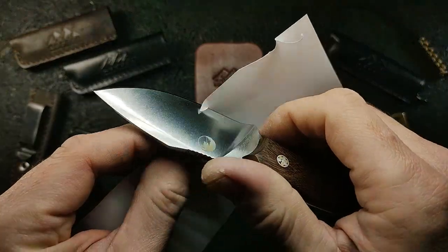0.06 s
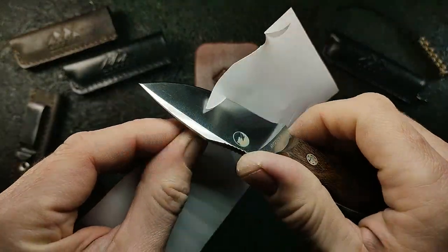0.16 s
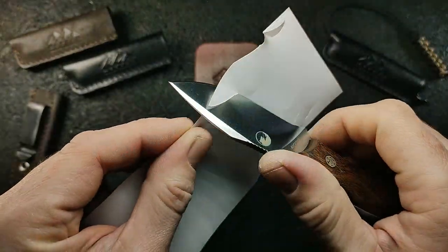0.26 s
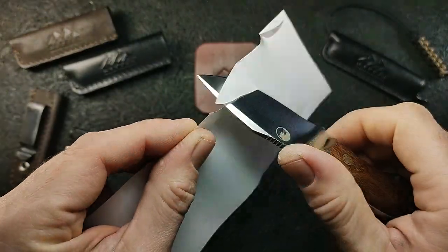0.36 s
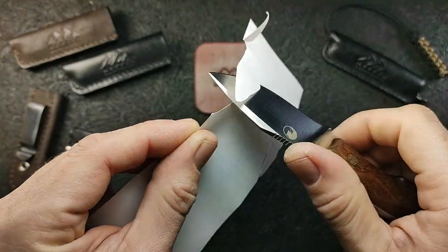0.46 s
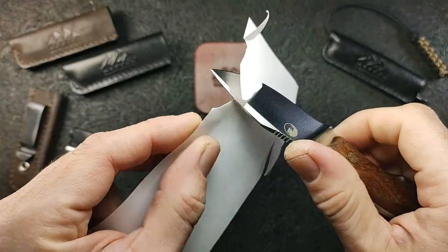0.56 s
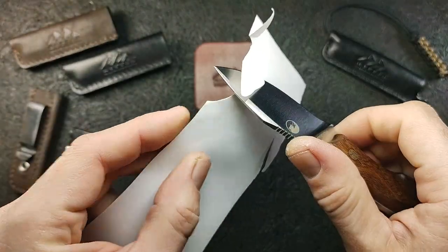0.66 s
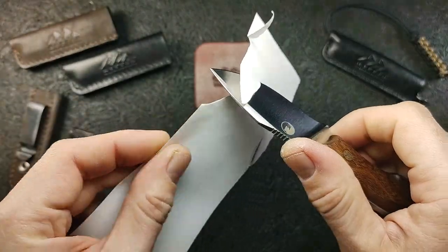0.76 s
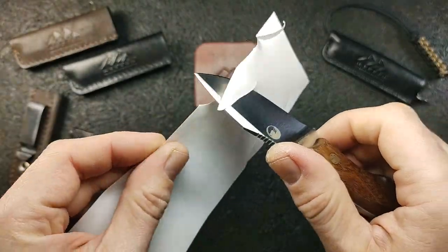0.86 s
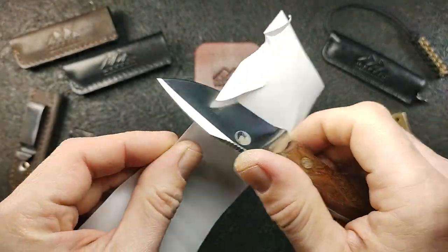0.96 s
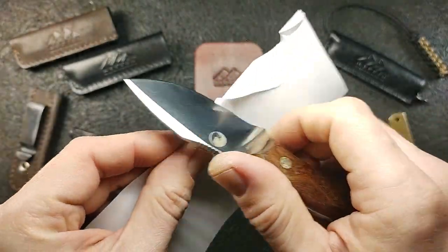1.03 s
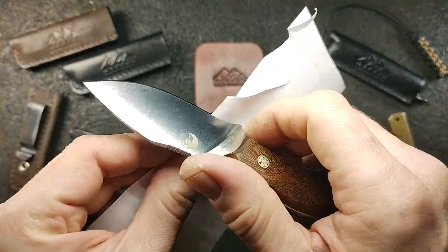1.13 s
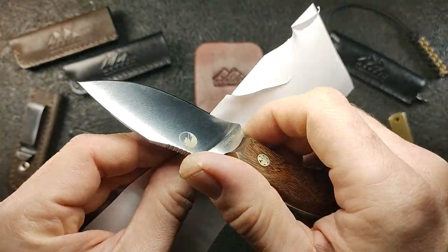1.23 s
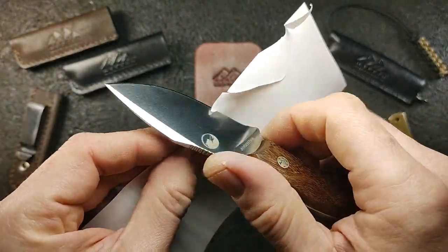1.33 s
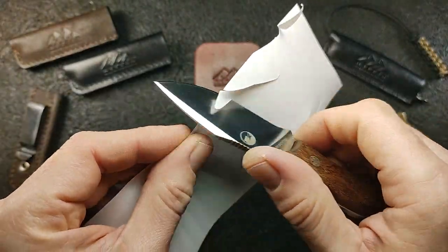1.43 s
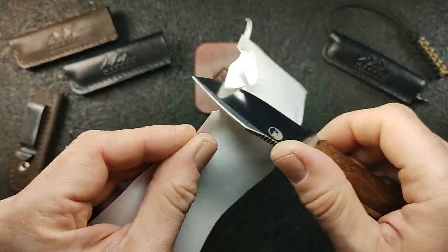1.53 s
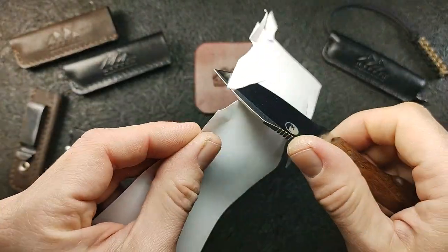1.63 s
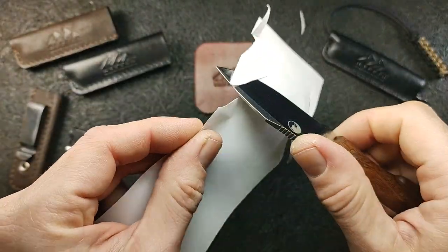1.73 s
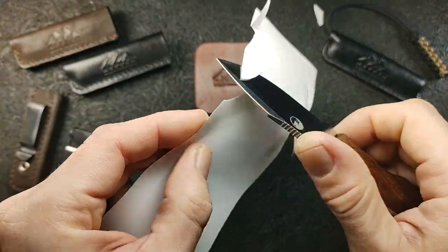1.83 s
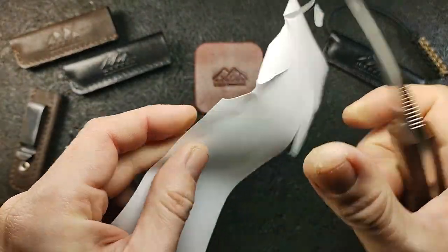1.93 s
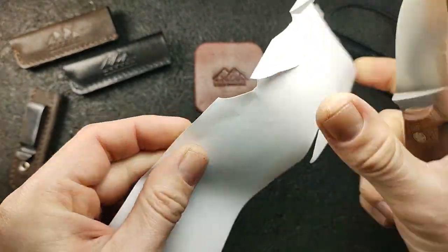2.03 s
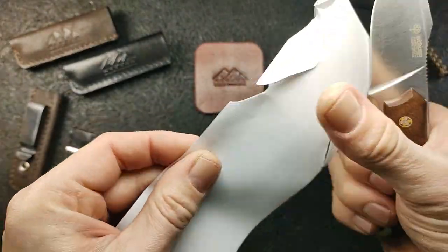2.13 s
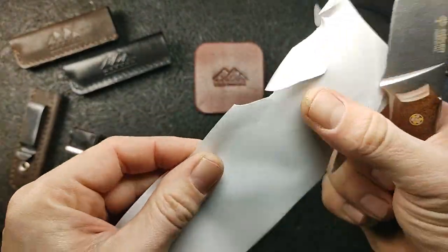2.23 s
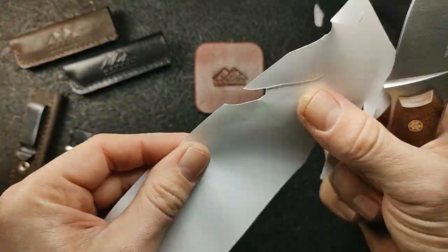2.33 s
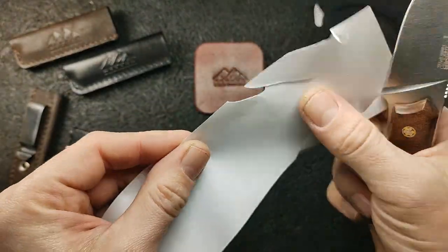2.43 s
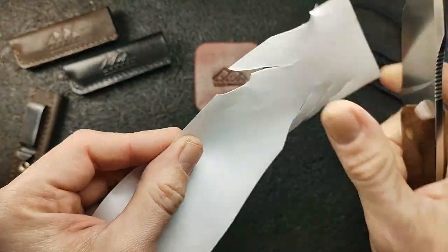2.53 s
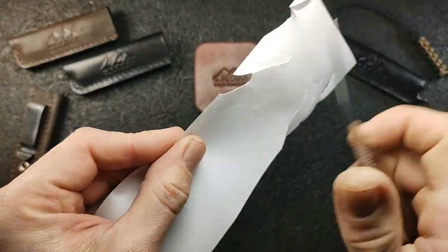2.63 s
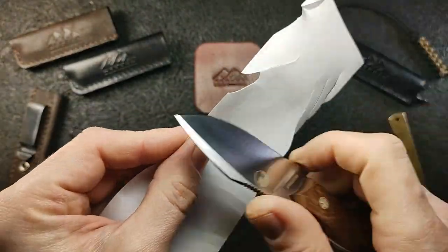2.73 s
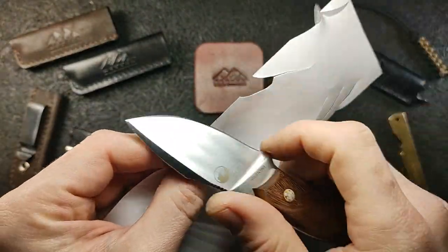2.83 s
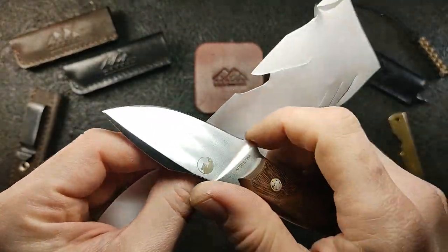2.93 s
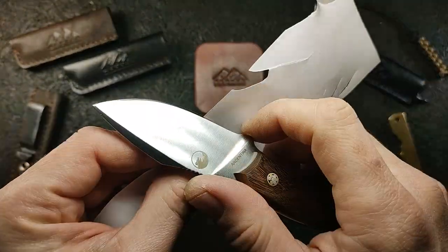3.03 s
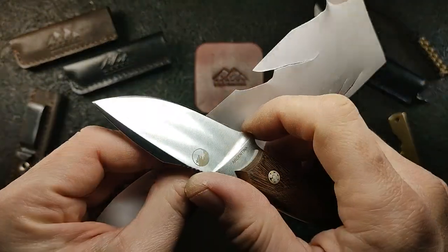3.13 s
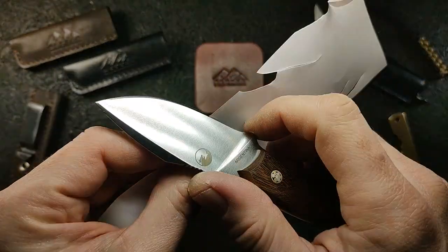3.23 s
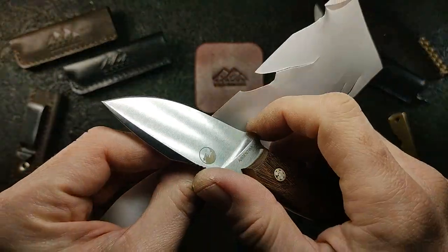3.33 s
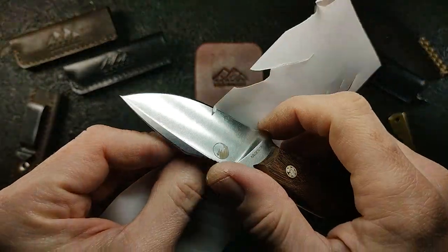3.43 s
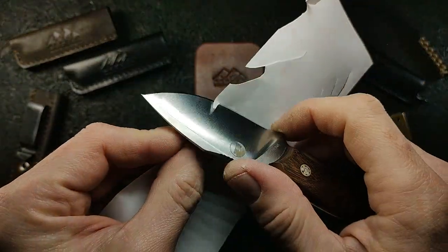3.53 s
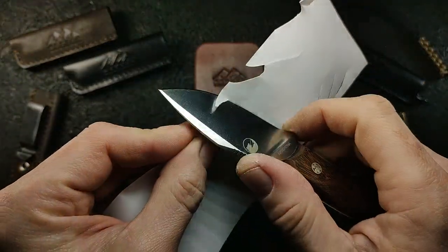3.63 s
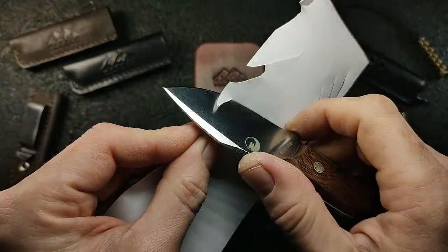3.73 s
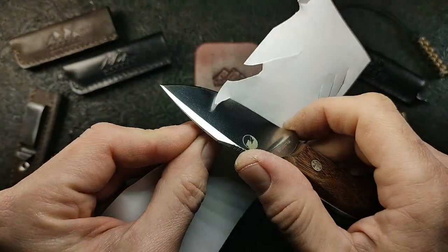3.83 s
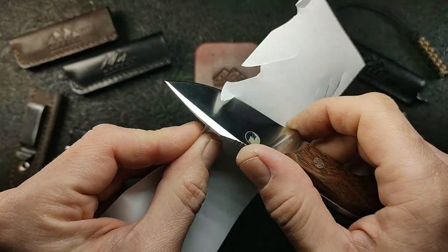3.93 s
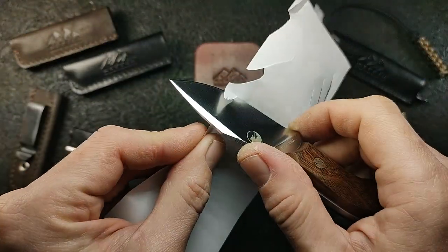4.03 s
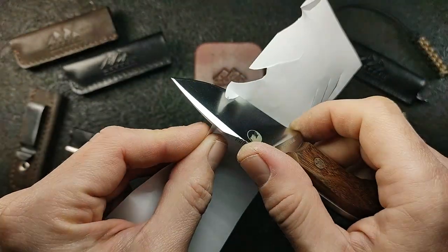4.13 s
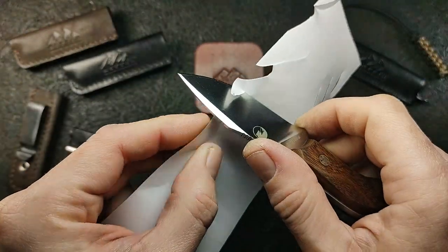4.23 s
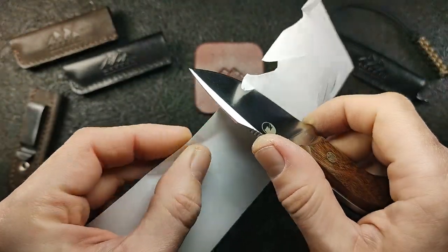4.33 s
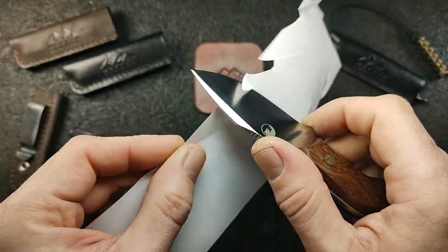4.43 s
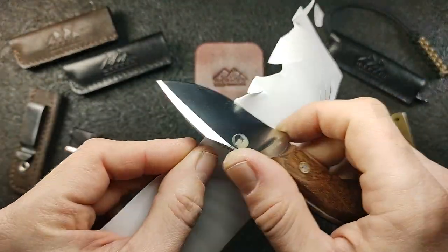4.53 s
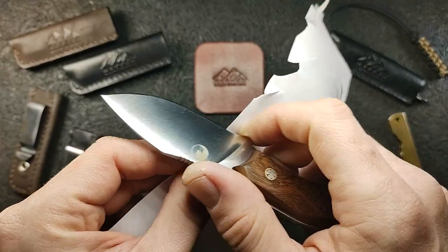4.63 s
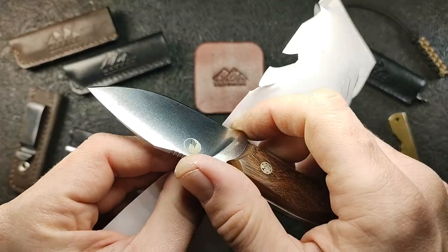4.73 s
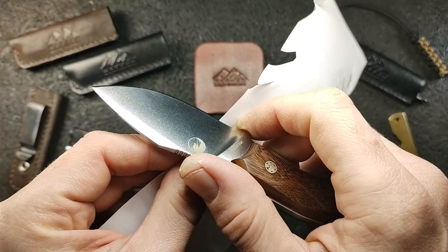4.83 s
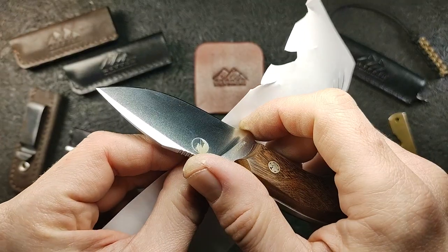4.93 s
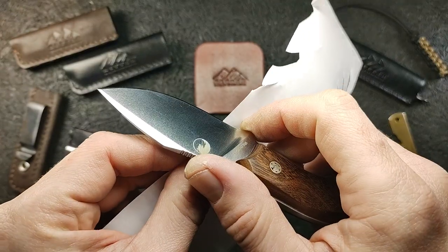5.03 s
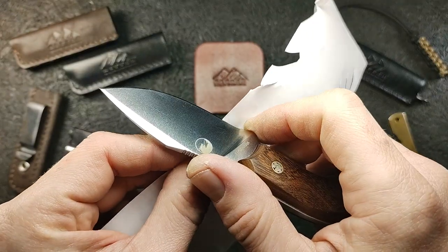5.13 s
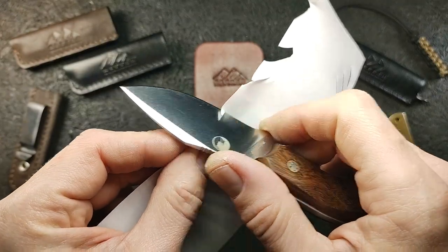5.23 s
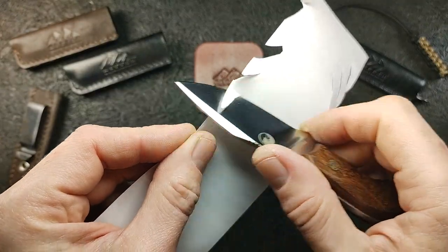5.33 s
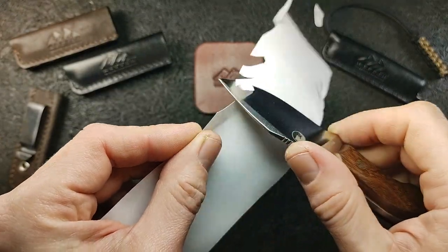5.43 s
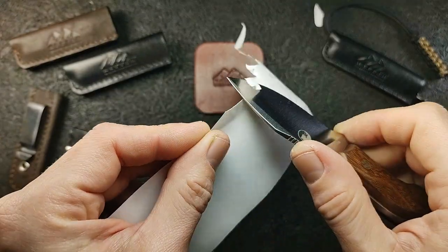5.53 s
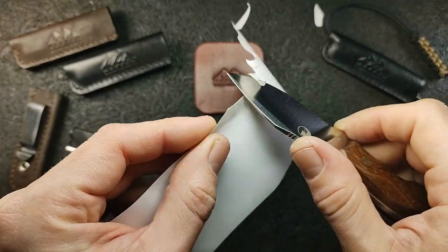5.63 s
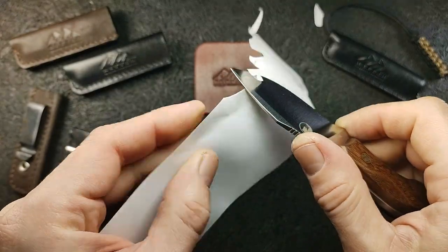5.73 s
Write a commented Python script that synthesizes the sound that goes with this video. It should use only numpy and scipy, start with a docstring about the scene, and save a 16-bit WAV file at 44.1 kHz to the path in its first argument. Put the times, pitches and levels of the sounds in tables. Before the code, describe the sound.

A sharp knife slices a hand-held sheet of paper close to the microphone, in a quiet room with a faint low hum. The first cut swells from about 0.2 seconds into a crisp, fizzing rasp, ending near 0.7 with small pops. A light scrape comes at 1.2, and a second strong slice builds from 1.4 to 1.8, finishing with a papery snap. From 2 seconds the sheet rustles softly under the fingers, then crinkles, with sharp pops near 2.5 and 2.7. After a faint scratch around 3.1, a gentler, uneven cut runs from 3.5 to 3.9, followed by a brief crackling nick at 4.1. Soft sliding hiss and little ticks continue until about 5. A last bright slice rises from 5.3 and dies away by 5.8 seconds.

```python
"""Close above a desk in a faintly humming room, a sharp knife slices strips off a hand-held sheet of paper.
Fibres fracture by the thousand at the edge; the strip's resonance glides up or down from push to push.
Between strokes, friction of fingers and blade makes the sheet hiss, buckling excites its modes
in small pops, and a new grip crumples it. Reflections off desk and hands follow the direct sound."""
import sys
import numpy as np
from scipy import signal
from scipy.fft import rfft, irfft, next_fast_len
from scipy.io import wavfile
from scipy.ndimage import map_coordinates

SR = 44100
rng = np.random.default_rng(int(sys.argv[2]) if len(sys.argv) > 2 else 0)


def materialize(psi):
    """Save the field psi as 16-bit PCM at rate SR to the path in sys.argv[1].

    A 1-D psi becomes a single channel; in a 2-D psi each row is a channel.
    """
    bounded = np.clip(np.atleast_2d(psi).T, -1, 1)
    quanta = np.round(bounded * 32767).astype(np.int16)
    wavfile.write(sys.argv[1], SR, quanta)


N = 254898

# The slow drift of the room's hum. Each row: time in seconds, level in dB.
HUM_LEVELS = [(0.0, -72), (0.26, -66.5), (0.46, -60), (1.33, -71), (2.58, -67), (2.78, -71), (3.73, -66),
              (4.1, -69.5), (5.13, -64.5), (5.57, -63), (5.78, -70)]
# Skin and the flat of the blade slide on the sheet. Each row: start, rise, hold and fall in seconds,
# hiss level in dB, murmur in dB relative to the hiss.
SLIDE_MOVES = [ (0.092, 0.021, 0.084, .03, -72, -6.5), (0.201, .008, 0.031, 0.11, -58.5, -10.5),
               (0.709, 0.081, 0.016, 0.32, -57.5, -5), (0.862, 0.069, 0.053, 0.35, -58.5, -6),
               (1.251, 0.063, 0.06, 0.064, -64, 0.5), (1.446, 0.01, .04, .04, -67, 3),
               (1.736, 0.017, 0.0057, 0.29, -64, 0.5), (1.934, 0.048, 0.031, 0.48, -56.5, -8.5),
               (2.117, 0.0053, 0.011, 0.017, -50.5, -16), (2.182, 0.074, 0.12, 0.084, -54, -14.5),
               (2.387, 0.027, 0.075, 0.25, -59, -5), (2.608, 0.009, 0.033, .03, -62, 1),
               (2.716, 0.014, 0.009, 0.18, -61, -2.5), (2.868, 0.047, 0.0075, 0.072, -54.5, -12),
               (3.387, 0.032, 0.012, 0.046, -76.5, 8.5), (3.515, 0.021, .02, 0.047, -72, 1),
               (3.912, 0.027, 0.064, 0.093, -82.5, 8.5), (4.17, 0.0092, 0.0086, 0.048, -58, -6),
               (4.243, 0.034, .014, 0.047, -57, -6), (4.35, 0.049, 0.18, 0.15, -57, -7.5),
               (4.685, 0.059, 0.079, 0.23, -59.5, -4.5), (4.943, 0.042, 0.065, 0.072, -67, -1.5),
               (5.275, 0.027, 0.046, 0.067, -71.5, -0.5)]
# The sheet buckles. Each row: start in seconds, peak level of the pop in dB, its centre in Hz,
# crackle and thump in dB relative to the pop.
BUCKLES = [ (0.092, -72.5, 2580, 14, -15), (0.117, -66.5, 2600, 10.5, -11), (0.203, -52, 1700, 3.5, -15),
           (0.215, -53.5, 1640, 5, -30), (0.48, -47.5, 2630, 9, -33), (0.601, -26, 1830, -12, -34),
           (0.677, -43, 1390, -10, -21), (0.733, -39.5, 450, -20, -5), (0.771, -36.5, 450, -15, -11),
           (1.066, -52.5, 452, 3, 1), (1.7, -29.5, 994, -12, -9.5), (1.723, -30.5, 598, 4, -7.5),
           (1.748, -41, 705, -10, -12), (2.021, -42.5, 776, -18, -12), (2.319, -44.5, 1700, 2, -22),
           (2.336, -37, 1330, -19, -27), (2.363, -43.5, 2440, 4, -28), (2.411, -44, 1730, 1, -18),
           (2.448, -39, 425, -4, -25), (2.455, -30, 1410, -13, -9), (2.484, -20.5, 1680, -7, -6),
           (2.677, -27, 1690, 6, -19), (2.7, -41.5, 705, 8.5, -8), (2.767, -54, 425, 12, -17),
           (3.258, -54, 2480, 9.5, -22), (4.089, -55, 480, 11, -30), (4.11, -37, 1730, -10, -40),
           (4.139, -38, 2570, -0.5, -11), (4.16, -31.5, 1300, -20, -33), (4.182, -57.5, 1710, 10.5, -19),
           (4.283, -44.5, 2530, 11.5, -31), (4.625, -54.5, 372, -15, -6), (4.685, -43.5, 2100, -3, -12),
           (4.697, -45, 478, 3, -13), (4.767, -49, 2470, 5.5, -25)]
# Bending modes of the sheet. Each row: frequency in Hz, bandwidth in Hz, gain in dB.
SHEET_MODES = [(423, 300, 5.5), (512, 266, 6.5), (833, 140, -0.5), (1274, 89, 0.5), (1712, 77, 3.5),
               (2416, 183, -4), (3260, 430, -6.5)]
# Pushes of the edge, one to five to a stroke. Each row: start, rise, hold and fall in seconds, rasp level
# in dB, fizz and flutter in dB relative to the rasp, strip resonance in Hz, its height in dB.
KNIFE_PUSHES = [ (0.145, 0.21, .085, 0.065, -42, 0, -17.5, 4400, 7),
                (0.44, 0.1, 0.033, .04, -31, -12, -27.5, 6190, 10.5),
                (0.468, 0.013, 0.027, 0.096, -40, 1, -24, 5370, 10),
                (0.548, .035, 0.033, 0.06, -30, -10.5, -27, 4660, 14.5),
                (0.6, 0.026, 0.03, 0.054, -40, -9.5, -5.5, 3720, -3),
                (1.13, 0.047, 0.022, 0.097, -50.5, -11.5, -14.5, 3650, 9.5),
                (1.18, 0.061, 0.029, 0.1, -49, 1, -17.5, 5730, 7.5),
                (1.425, 0.23, .018, 0.039, -32, -0.5, -17, 4900, 6),
                (1.686, 0.017, 0.05, .026, -39.5, 0, -8, 5600, 7.5),
                (3.033, 0.019, 0.025, 0.046, -51, -7, -22, 2620, 10.5),
                (3.06, 0.062, 0.095, 0.055, -60, -13, -17.5, 2520, 10.5),
                (3.245, 0.012, 0.013, 0.24, -62, -15, -17, 2740, 11),
                (3.545, 0.083, 0.089, 0.037, -42.5, -11.5, -22, 4800, 7),
                (3.665, 0.039, 0.022, 0.18, -40, -11.5, -17.5, 3300, 2),
                (3.775, 0.038, 0.028, 0.061, -42, -10, -12, 3060, 7),
                (3.83, 0.027, 0.046, 0.022, -41.5, -5, -11, 3100, 2.5),
                (4.088, 0.024, .03, 0.036, -43, -6, -15.5, 3130, 1.5),
                (5.305, 0.2, 0.038, .05, -35, -4, -20, 4460, 9.5),
                (5.535, 0.014, 0.029, 0.11, -30.5, -4.5, -30, 4460, 26.5),
                (5.555, 0.043, 0.034, 0.069, -34, -12, -14.5, 4830, 2.5)]
# The fingers take a new grip. Each row: the same quantities as for a push of the edge.
GRIP_MOVES = [ (2.44, .017, 0.0074, 0.072, -46, -5.5, -5.5, 3470, 4.5),
              (2.47, 0.018, .008, 0.066, -45, -7, -9, 3630, 12),
              (2.647, .012, 0.026, 0.065, -43, -4, -11.5, 4530, 17)]

# Spectra of the noises. Each row: frequency in Hz, relative spectral density in dB.
HUM_SPECTRUM = [(20, -52.5), (33, -28), (45, -6.5), (58, -12), (86, 0), (115, -15.5), (155, -13.5),
                (200, -28.5), (400, -52.5)]
AIR_SPECTRUM = [(30, -28.5), (150, -2), (300, -8.5), (800, -12.5), (2000, -17), (2450, -15), (3300, -21.5),
                (4200, -19.5), (7000, -25), (11000, -28), (15800, -26.5)]
HISS_SPECTRUM = [(1500, -18.5), (3200, 4.5), (4200, 1), (7000, 3.5), (10000, -0.5), (15800, -3.5)]
MURMUR_SPECTRUM = [(100, -29.5), (450, -1.5), (950, -5.5), (1350, -1), (1950, -5.5), (2450, 0), (3100, -15),
                   (4200, -2), (8000, -58.5)]
CREASE_SPECTRUM = [(300, -10.5), (1200, -16.5), (2700, 2.5), (5000, 2.5), (8000, -9), (11000, -12.5),
                   (15800, -12)]
RASP_SPECTRUM = [(600, -56), (1050, -3), (1320, 8.5), (1550, 2), (1800, 9), (2080, 0), (2650, 7),
                 (3200, -4), (3950, 2), (4500, -3), (5300, 0), (7200, 0), (8800, -8.5), (11000, -35)]  # peaks at the sheet's own resonances
FIZZ_SPECTRUM = [(6000, -33), (8500, -0.5), (9800, -2), (11200, -0.5), (12600, 0), (14700, -1),
                 (15800, -6.5)]
FLUTTER_SPECTRUM = [(60, -36.5), (150, -3), (280, -9.5), (450, 1.5), (620, -3), (800, 5), (1000, -6.5),
                    (1500, -9), (3000, -78.5)]

# Likeness of left and right. Each row: frequency in Hz, correlation from 0 to 1.
STEREO_CORRELATION = [(60, 1), (600, 0.61), (1300, 0.25), (2500, 0.74), (15000, 0.11)]
# Colour of the reflections off desk, hands and room. Each row: frequency in Hz, gain in dB.
REFLECTION_GAINS = [(100, -44.5), (500, -18), (1200, -7), (2200, 2), (5000, 3), (15000, -1)]

# Amplitude is a power of hand speed: the fizz needs a fast edge, the sheet flutters at any speed.
RASP_POWER, FIZZ_POWER, FLUTTER_POWER, SLIDE_POWER = 2.42, 2.7, 1.62, 2.27


def amp(db):
    """Amplitude grows tenfold for every 20 dB."""
    return 10 ** (np.asarray(db) / 20)


def unit(x):
    """Normalisation to an rms of 1."""
    return x / np.sqrt(np.mean(x ** 2) + 1e-20)


def along(points, hz):
    """Interpolation of (Hz, value) points on a logarithmic frequency axis."""
    knots_hz, values = np.transpose(points)
    return np.interp(np.log(hz + 1), np.log(knots_hz + 1), values)


def per_sample(control):
    """Linear interpolation of a slow control to one value per sample."""
    return np.interp(np.arange(N), np.linspace(0, N, len(control)), control)


def wobble(rate):
    """Smooth random modulation: a spline through rate Gaussian knots a second."""
    return map_coordinates(rng.standard_normal(int(N * rate / SR) + 4), [np.arange(N) * rate / SR])


def filtered(x, response):
    """Linear filtering multiplies the spectrum by a complex frequency response."""
    n = x.shape[-1]
    size = next_fast_len(n + SR // 8, real=True)
    return irfft(rfft(x, size) * response(np.fft.rfftfreq(size, 1 / SR)), size)[..., :n]


def coloured(x, spectrum):
    """Spectral shaping, normalised to an rms of 1."""
    return unit(filtered(x, lambda hz: amp(along(spectrum, hz))))


def stereo(pair):
    """Partial coherence: independent mid and side signals give channels most alike in the bass."""
    def weights(hz):
        angle = np.arccos(np.clip(along(STEREO_CORRELATION, hz), -1, 1)) / 2
        return np.array([np.cos(angle), np.sin(angle)])
    mid, side = filtered(pair, weights)
    return np.array([mid + side, mid - side])


def speeds(moves):
    """Uniform acceleration: in each move the hand's speed rises from 0 to 1, holds and falls to 0."""
    t = np.arange(0, N, 32) / SR
    return np.array([np.interp(t, np.cumsum(np.abs(move[:4])), [0, 1, 1, 0]) for move in moves])


def envelope(speed, db, power):
    """Incoherent sources add in power; each move reaches its level at full speed."""
    return per_sample(np.sqrt(amp(db) ** 2 @ speed ** (2 * power)))


def room_hum():
    """Background noise: a low hum that drifts in level, under faint steady air."""
    times, levels_db = np.transpose(HUM_LEVELS)
    hum_db = np.interp(np.arange(N) / SR, times, levels_db)
    hum = amp(hum_db) * coloured(rng.standard_normal((2, N)), HUM_SPECTRUM)
    air = amp(-71.0) * coloured(rng.standard_normal((2, N)), AIR_SPECTRUM)
    return stereo(hum + air)


def fibre_snaps(per_second, scatter_db, friction, delay_s=.002):
    """Shot noise: fibres let go at random over smooth friction, radiating unevenly in two directions."""
    hits = rng.random(N) < per_second / SR
    sizes = amp(scatter_db * np.clip(rng.standard_normal(N), -2, 2))
    signs = rng.choice([-1, 1], (2, N))
    # Dispersion: high bending waves travel faster, so a snap is a falling chirp; delay_s holds at 1 kHz.
    chirps = filtered(hits * sizes * signs, lambda hz: np.exp(-4j * np.pi * delay_s * np.sqrt(hz * 1000)))
    return unit(unit(chirps) + friction * rng.standard_normal((2, N)))


def sliding():
    """Sliding friction on the paper's grain radiates a fine hiss over the murmur of the sheet."""
    speed = speeds(SLIDE_MOVES)
    hiss_db, murmur_db = np.transpose(SLIDE_MOVES)[4:]
    grain = fibre_snaps(per_second=3200, scatter_db=-1.0, friction=1.0) * amp(0.68 * wobble(90))
    hiss = envelope(speed, hiss_db, SLIDE_POWER) * coloured(grain, HISS_SPECTRUM)
    murmur = envelope(speed, hiss_db + murmur_db, SLIDE_POWER) * coloured(grain, MURMUR_SPECTRUM)
    return hiss + murmur


def resonance(hz, centre_hz, width_hz):
    """A damped oscillator responds most strongly at its natural frequency."""
    return 1j * hz * width_hz / (centre_hz ** 2 - hz * hz + 1j * hz * width_hz)


def sheet_response(hz):
    """Modal superposition: the sheet's resonances add with alternating sign."""
    return sum((-1) ** k * amp(db) * resonance(hz, mode_hz, width_hz)
               for k, (mode_hz, width_hz, db) in enumerate(SHEET_MODES))


def buckling(thump_hz, thump_t60, ring_t60, crackle_t60, rise_s, breadth):
    """Snap-through buckling: an impulse rings the modes, creases crackle and displaced air thumps."""
    t = np.arange(SR // 8) / SR
    pops = np.zeros((2, N + len(t)))
    rise = 1 - np.exp(-t / rise_s)
    thump = np.sin(2 * np.pi * thump_hz * t) * amp(-60 * t / thump_t60) * rise
    creases = coloured(fibre_snaps(per_second=2800, scatter_db=-9.0, friction=0.097), CREASE_SPECTRUM)
    for start_s, db, centre_hz, crackle_db, thump_db in BUCKLES:
        span = slice(round(start_s * SR), round(start_s * SR) + len(t))
        force = (t == 0) + .06 * rng.standard_normal(len(t)) * amp(-60 * t / ring_t60)
        # A large slow flip favours the low modes, a small quick one the high modes.
        ring = filtered(force, lambda hz: sheet_response(hz) * resonance(hz, centre_hz, centre_hz * breadth))
        pops[0, span] += amp(db) * (ring / abs(ring).max() + amp(thump_db) * thump)
        pops[:, span] += amp(db + crackle_db) * creases[:, span] * rise * amp(-60 * t / crackle_t60)
    return pops[:, :N]


def strip_resonance(x, centre_hz, height_db, octaves):
    """A broad, gliding resonance of the loose strip redistributes power without adding any."""
    hz, t, spectra = signal.stft(x, SR, nperseg=256)
    centre, height = (np.interp(t, np.arange(N) / SR, per_sample(c)) for c in (centre_hz, height_db))
    detuning = np.log2((hz[:, None] + 1) / centre) / octaves
    gain = amp(height * np.exp(-.5 * detuning ** 2))
    power = np.mean(abs(spectra[0]) ** 2, axis=1, keepdims=True)
    gain /= np.sqrt((power * gain ** 2).sum(0) / power.sum())
    return signal.istft(spectra * gain, SR, nperseg=256)[1][:, :N]


def fracture(moves, per_second, scatter_db, clump_db):
    """Fracture in cutting or crumpling: clumps of snaps fizz, ring the strip and shake the sheet."""
    speed = speeds(moves)
    rasp_db, fizz_db, flutter_db, strip_hz, height_db = np.transpose(moves)[4:]
    # Where moves overlap, the strip's resonance glides from one to the next.
    share = (amp(rasp_db)[:, None] * speed * speed) ** 2 + 1e-18
    share /= share.sum(0)
    fibres = fibre_snaps(per_second, scatter_db, friction=0.28)
    fibres *= amp(clump_db * wobble(320) + 1.3 * wobble(60))
    ringing = coloured(fibres, RASP_SPECTRUM)
    ringing = strip_resonance(ringing, strip_hz @ share, height_db @ share, octaves=0.59)
    shaking = coloured(fibres * amp(1.05 * wobble(130)), FLUTTER_SPECTRUM)
    rasp = envelope(speed, rasp_db, RASP_POWER) * ringing
    fizz = envelope(speed, rasp_db + fizz_db, FIZZ_POWER) * coloured(fibres, FIZZ_SPECTRUM)
    flutter = envelope(speed, rasp_db + flutter_db, FLUTTER_POWER) * shaking
    return rasp + fizz + flutter


def propagation(paper, lead_s, echo_t60, echo_db, room_t60, room_db, hop):
    """Multipath: direct sound reaches the left first; echoes keep changing as the sheet moves."""
    t = np.arange(3 * hop) / SR
    echoes = np.zeros((2, N + 6 * hop))
    padded = np.pad(paper[0], (hop, 2 * hop))
    window = np.sin(np.pi * np.arange(2 * hop) / (2 * hop))
    for start in range(0, N + hop, hop):
        early, late = rng.standard_normal((2, 2, len(t))) * (t > .0004)
        desk_and_hands = amp(echo_db) * unit(early * amp(-60 * t / echo_t60))
        reverberation = amp(room_db) * unit(late * amp(-60 * t / room_t60))
        response = (desk_and_hands + reverberation) / np.sqrt(len(t))
        block = padded[start:start + 2 * hop] * window
        reflected = signal.fftconvolve(block[None], response, axes=1)
        echoes[:, start:start + reflected.shape[1]] += reflected
    direct = filtered(stereo(paper), lambda hz: np.exp(1j * np.pi * hz * lead_s * np.array([[1], [-1]])))
    return direct + filtered(echoes[:, hop:hop + N], lambda hz: amp(along(REFLECTION_GAINS, hz)))


def scene():
    """Sources superpose in the room; time and level cues place the paper a little left of centre."""
    cuts = fracture(KNIFE_PUSHES, per_second=3800, scatter_db=0.5, clump_db=-0.96)
    crumples = fracture(GRIP_MOVES, per_second=2700, scatter_db=5.5, clump_db=1.7)
    pops = buckling(thump_hz=170, thump_t60=0.024, ring_t60=0.058, crackle_t60=0.022,
                    rise_s=0.0013, breadth=1.2)
    paper = propagation(cuts + crumples + sliding() + pops, lead_s=0.00015,
                        echo_t60=0.013, echo_db=-4.0, room_t60=0.29, room_db=-20, hop=3072)
    return (paper + room_hum()) * amp([[.9], [-.9]])


def record(dry):
    """Band limiting: the microphone rolls off below 42 Hz and passes nothing above 15850 Hz."""
    thinned = signal.sosfilt(signal.butter(4, 42, "highpass", fs=SR, output="sos"), dry)
    return filtered(thinned, lambda hz: hz < 15850)


dry = scene()
out = record(dry)
materialize(out)
```